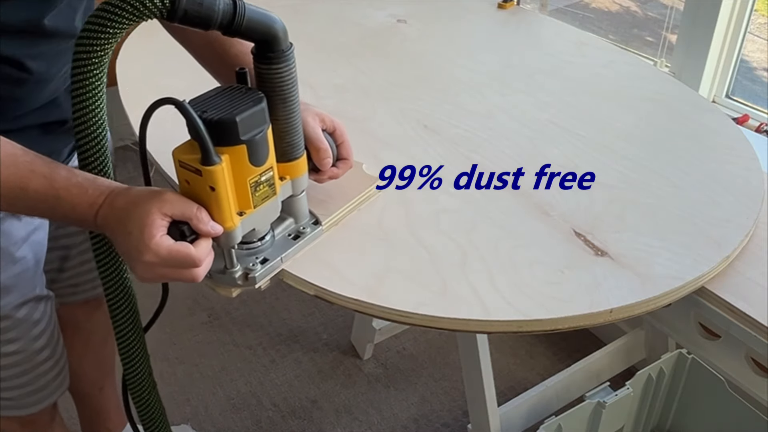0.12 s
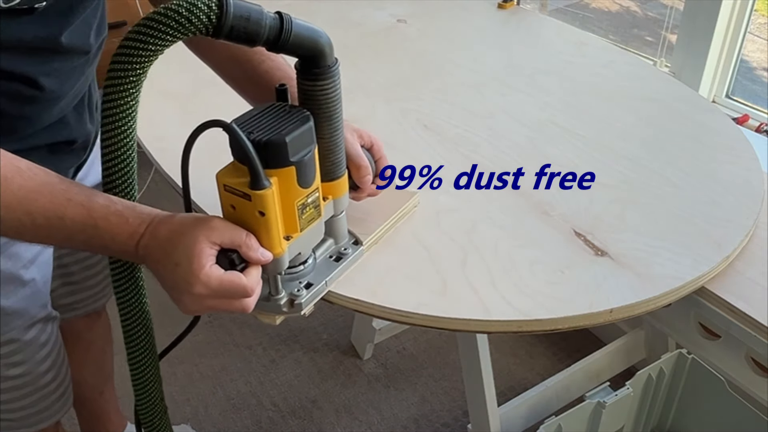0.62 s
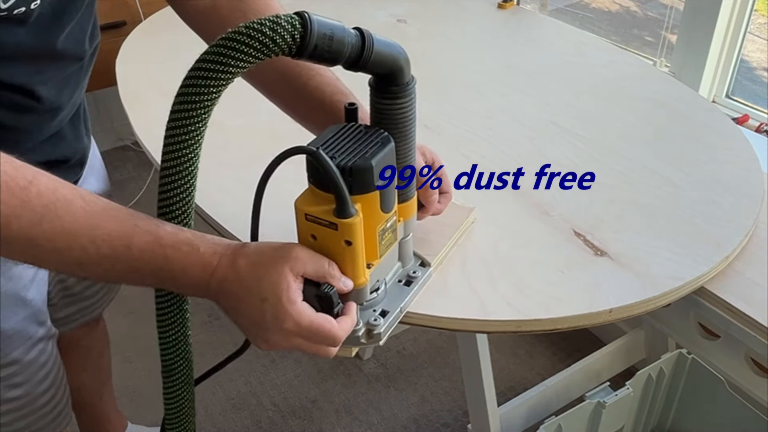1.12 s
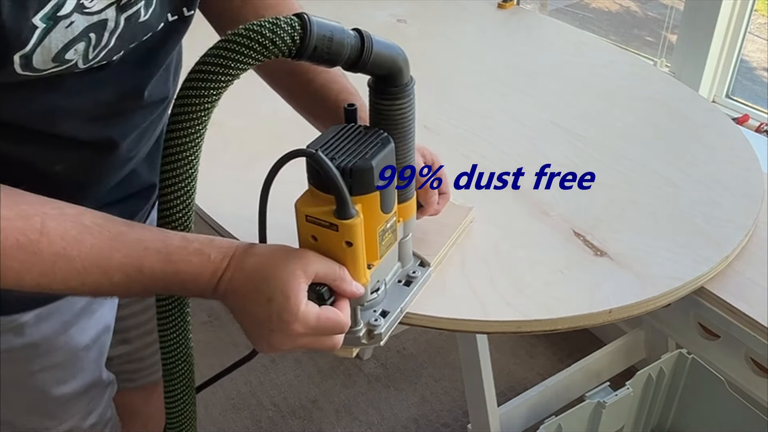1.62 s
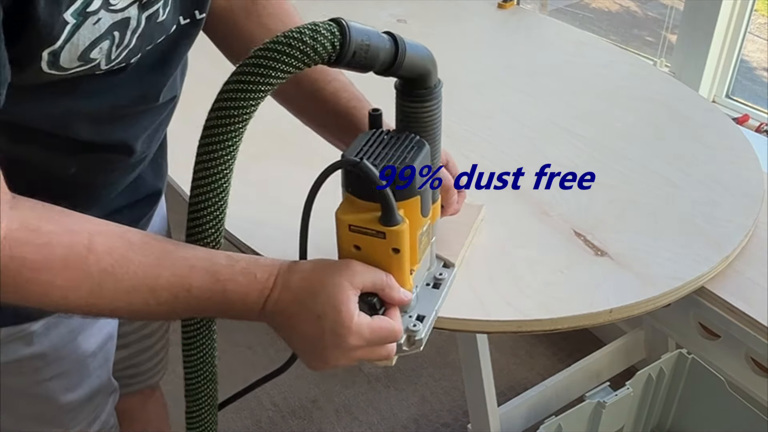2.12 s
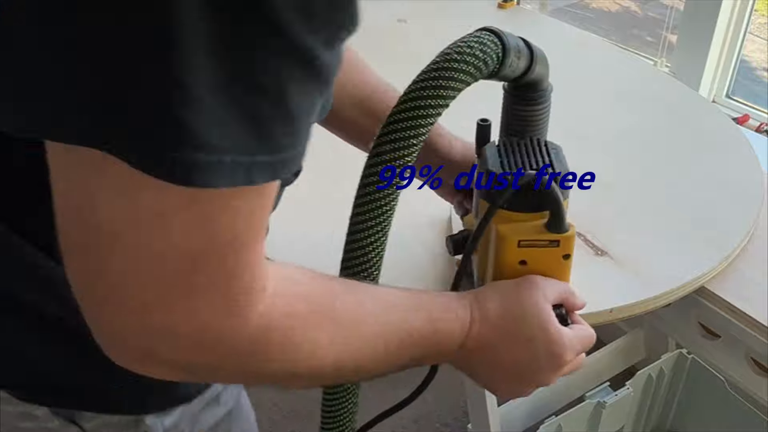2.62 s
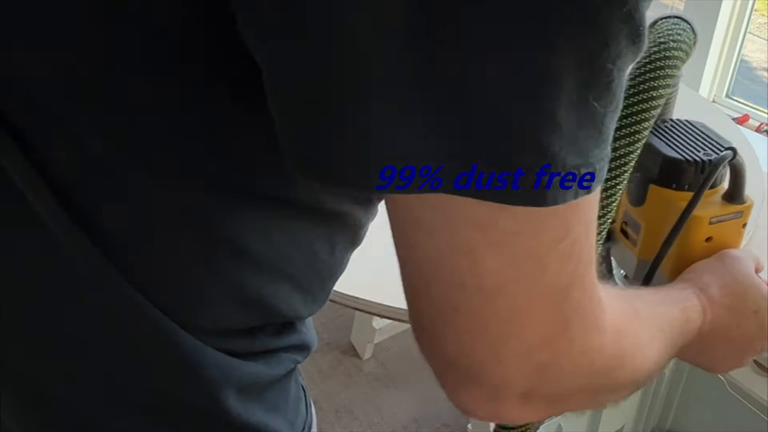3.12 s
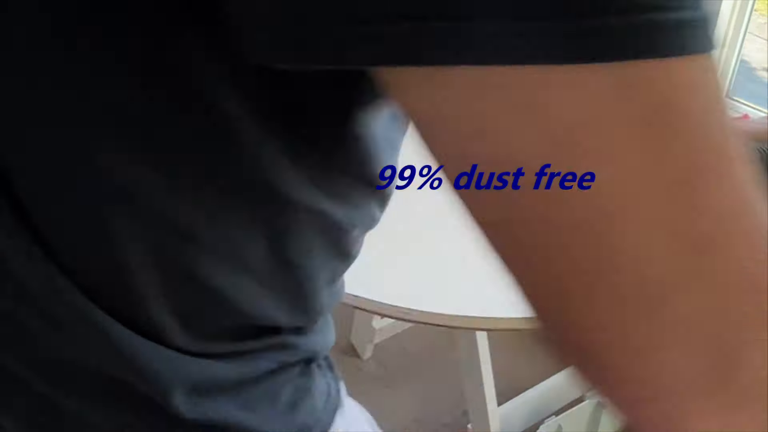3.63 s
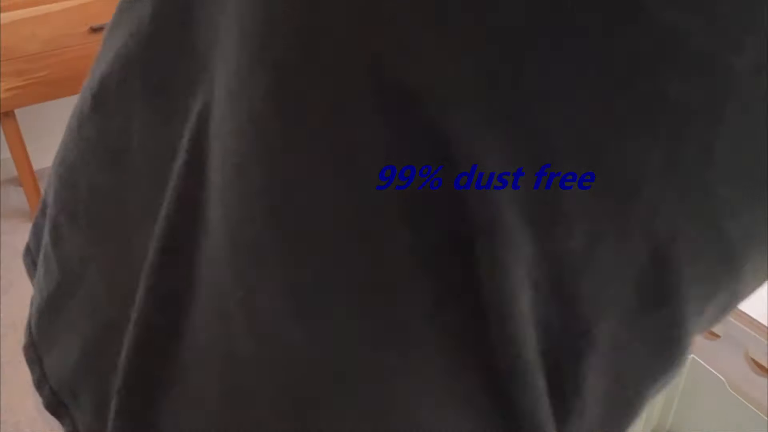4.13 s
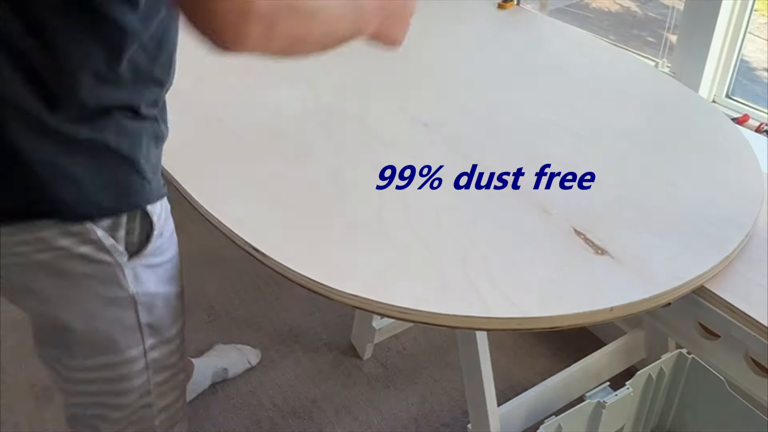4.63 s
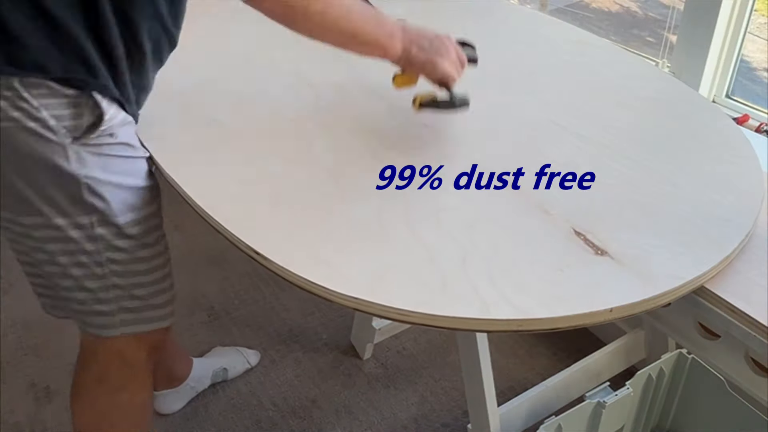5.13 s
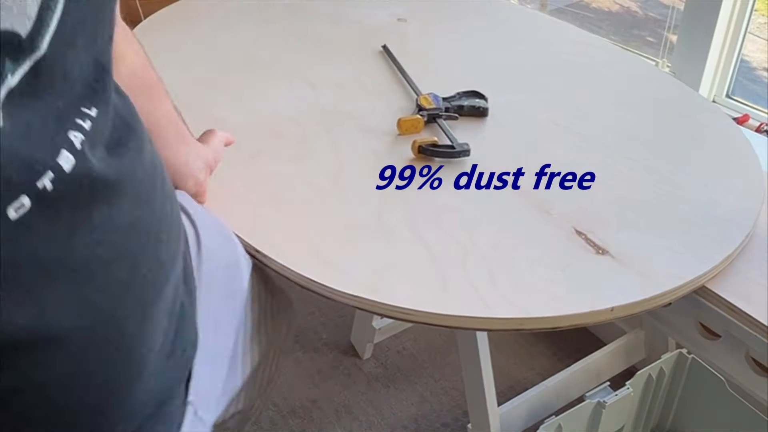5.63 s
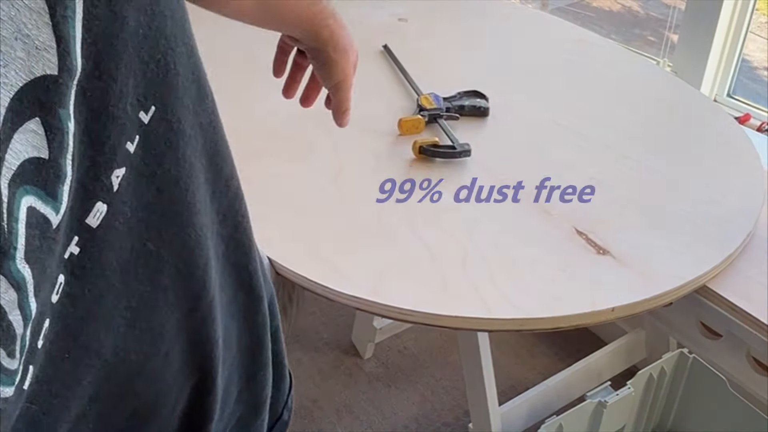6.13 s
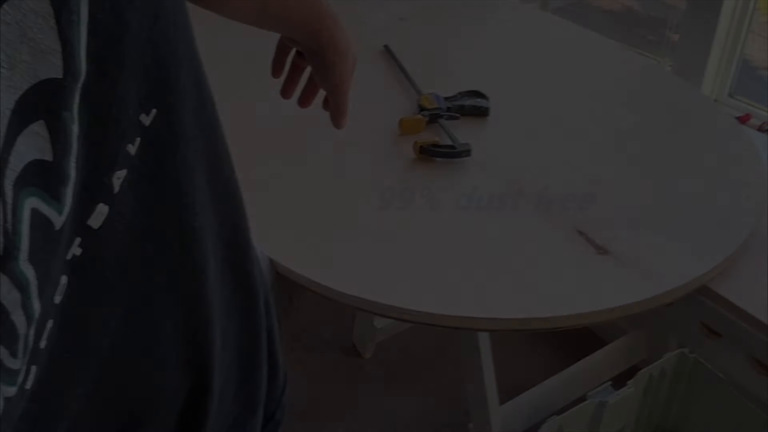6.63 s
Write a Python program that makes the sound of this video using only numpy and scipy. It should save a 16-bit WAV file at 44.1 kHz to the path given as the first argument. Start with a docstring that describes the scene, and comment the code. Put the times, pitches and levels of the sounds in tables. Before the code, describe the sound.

A router whines loudly along plywood over a dust extractor's rush, spins down, restarts, coasts out, then a soft thud and scuff before silence.

```python
"""Small workshop, two close microphone ports: a plunge router whines along a plywood edge over a dust extractor.
Just before 1 s it is switched off and spins down, restarts at 1.7 s, and coasts out for good from 3.3 s.
Its shaft orders, bearing tone with sidebands and fan whistle are gliding sines; its cooling air is shaped noise.
The extractor, noise with hose resonances and a faint hum, is heard low under the router and then rises: a set
level curve stands for the recorder's automatic gain.
A low decaying sine thuds at 4.8 s and a noise scuff follows at 5.1 s; just after 6 s all fades to silence."""
import sys
import numpy as np
from scipy import signal
from scipy.io import wavfile
from scipy.ndimage import uniform_filter1d

SR = 44100
rng = np.random.default_rng(int(sys.argv[2]) if len(sys.argv) > 2 else 0)


def level_to_linear(level):
    """Convert decibel levels to linear amplitude factors, elementwise."""
    exponent = np.asarray(level, float) / 20
    return 10 ** exponent


def file_out(sig):
    """Save sig as 16-bit WAV at sys.argv[1]."""
    # one column per channel
    cols = np.atleast_2d(sig).T
    # limit, then scale
    lim = np.clip(cols, -1, 1)
    pcm = np.round(lim * 32767).astype(np.int16)
    wavfile.write(sys.argv[1], SR, pcm)


N = 297675

# router switch: (off [s], on again [s]); the last pair never comes on
SWITCH = [(.98, 1.69), (3.255, 9)]
# bearing tone against the shaft: (time [s], multiple of shaft speed)
BEARING_RATIO = [(0, 3.615), (.5, 3.6), (.66, 3.62), (.78, 3.645), (1.25, 3.69), (1.7, 3.63), (2, 3.61),
                 (2.25, 3.625), (2.6, 3.645), (2.76, 3.615), (3, 3.628), (3.25, 3.635), (3.4, 3.66)]
# upper shaft harmonics: (multiple of shaft speed)
HIGHER_ORDERS = (3, 5, 6, 7, 8, 9, 10, 11, 13, 14, 15, 17)
# one row per upper harmonic: (level in the group [dB], left over right [dB], left leads [rad])
HIGHER_TONES = [(-9, 17.5, 1.5), (-12.5, -7.5, 1), (-7.5, 5.5, -0.4), (-14, -1.5, 0.5), (-8, 13.5, -2.5),
                (-12.5, -1.5, -1), (-13.5, 2.5, 2), (-14, 12.5, -1), (-9.5, 11.5, 4), (-15, 10.5, 2.3),
                (-19, 7, 4.5), (-12.5, 13.5, 8)]
# bearing sidebands: (distance from the bearing tone [shaft turns])
SIDE_TURNS = (-2, -1, 1, 2, 3, 4, 5)
# one row per sideband: (level in the group [dB], left over right [dB], left leads [rad])
SIDEBAND_TONES = [(-27.5, -2, 1.5), (-17, 1, -1.5), (-11.5, 3.5, -2.16), (-4.5, 5, -1.33), (-23, -4, 3.5),
                  (-15.5, 6, 3.5), (-11.5, 1, 1.72)]
# single tones at the ports: (left over right [dB], left leads [rad], change of lead [rad/s], flicker [dB])
SHAFT_TONE = (16, 2.5, 0.75, 1.8)
BITE_TONE = (-1.3, 1.82, 0.2, 1.6)
FOURTH_TONE = (1.4, -.9, 1.21, 2.3)
BEARING_TONE = (2.5, -.1, .7, 1.5)
OCTAVE_TONE = (2.5, -1.3, .05, 2.5)
WHISTLE_TONE = (-1.5, -1.2, .05, 4.5)
HUM_TONE = (2, 1, 0, 3.5)
# shaft and bearing, powered and coasting alike: (time [s], level [dB])
SHAFT_LEVEL = [(0, -39.5), (.88, -39), (1.05, -49), (1.12, -61), (1.2, -59), (1.4, -53.5), (1.68, -75),
               (1.8, -43), (1.9, -54.5), (2, -44.5), (2.25, -44), (2.48, -38), (3.1, -40), (3.2, -44.5),
               (3.36, -42), (3.43, -74), (3.6, -61), (3.78, -83), (3.97, -54), (4.1, -64), (4.3, -89)]
BEARING_LEVEL = [(0, -39.5), (.44, -43), (.66, -55), (.77, -33.5), (.87, -25.5), (.998, -25.5), (1.01, -50),
                 (1.06, -60), (1.25, -51), (1.36, -48), (1.5, -45), (1.66, -50), (1.72, -57), (1.81, -49.5),
                 (1.84, -29), (2.05, -28), (2.17, -32), (2.28, -40), (2.48, -32.5), (2.6, -48),
                 (2.96, -35.5), (3.3, -43), (3.45, -49), (3.75, -56), (4, -51), (4.3, -72)]
# two-flute bite, fourth order, upper harmonics, sidebands, bearing octave and fan whistle
# while powered: (time [s], level [dB])
BITE_LEVEL = [(0, -40.5), (.22, -33), (.35, -32), (.62, -32), (.76, -29.5), (.88, -41.5), (1, -51),
              (1.76, -28.5), (1.9, -28.5), (2.25, -32), (2.46, -37.5), (2.56, -34.5), (2.72, -38),
              (2.96, -33), (3.2, -35), (3.27, -41)]
FOURTH_LEVEL = [(0, -53.5), (.33, -44.5), (.66, -38.5), (.9, -50), (1.8, -37), (1.9, -51), (2, -42.5),
                (2.24, -48.5), (2.5, -41.5), (2.96, -33), (3.1, -32), (3.27, -54)]
HIGHER_LEVEL = [(0, -31.5), (.66, -32.5), (.88, -44.5), (1, -56), (1.8, -41), (1.9, -33), (2.45, -41.5),
                (2.6, -36.5), (3.1, -38.5), (3.27, -54)]
SIDES_LEVEL = [(0, -29.5), (.11, -32.5), (.77, -32), (1, -44.5), (1.8, -36.5), (1.9, -32), (2.24, -34),
               (2.72, -42), (2.96, -33), (3.25, -39.5)]
OCTAVE_LEVEL = [(0, -50), (.75, -50), (.9, -40.5), (1.8, -44), (2, -52), (2.48, -42.5), (3.3, -54.5)]
WHISTLE_LEVEL = [(0, -41), (.11, -32.5), (.8, -34), (1, -48.5), (1.8, -47), (1.83, -27.5), (1.9, -42),
                 (2.45, -41), (2.6, -51), (2.72, -34.5), (3.08, -44.5), (3.2, -60), (3.27, -39)]
# the same six unpowered, in that order: (level carried back to full speed [dB], fall [dB per octave of speed])
COASTING = [(-58, 13), (-54.5, 5), (-48.5, 15.5), (-48, 11.5), (-56, 5), (-46, 11.5)]
# table and workshop modes that ring as a gliding tone passes: (frequency [Hz], width [Hz], level [dB])
RINGING = [(138, 26, 17), (190, 14, 17), (238, 18, 10), (290, 14, 18), (580, 30, 2), (810, 50, 12),
           (1535, 50, 16)]
# colour of the cooling air at full speed: (frequency [Hz], relative density [dB per Hz])
AIR_COLOUR = [(60, -28), (250, -18), (480, -11), (900, -6.5), (1500, -4), (2200, -4.5), (3500, -8.5),
              (5200, -9), (7000, -11), (11000, -15.5), (14800, -22), (16300, -42.5)]
# the thud: (time [s], level before its soft onset [dB], frequency [Hz], time to fall 60 dB [s])
THUD = (4.8, -21, 215, .06)
# the scuff: (time [s], level [dB])
SCUFF_LEVEL = [(5.108, -55), (5.125, -27), (5.138, -26.5), (5.15, -29), (5.165, -33), (5.19, -60)]
# its colour: (frequency [Hz], relative density [dB per Hz])
SCUFF_COLOUR = [(60, -11.5), (150, -2.5), (800, 1), (2300, -5.5), (5500, -14.5), (10000, -26)]
# colour of the suction: (frequency [Hz], relative density [dB per Hz])
SUCTION_COLOUR = [(18, -45.5), (30, -21), (189, -7), (345, -14), (569, -7.5), (889, -9), (1250, -1.5),
                  (1720, -12.5), (1960, -19.5), (3400, -13.5), (4420, -18), (5170, -18.5), (6050, -24.5),
                  (9970, -23), (16000, -42)]
# hose and canister resonances: (frequency [Hz], width [Hz], lift [dB])
HOSE = [(584, 35, 7), (1268, 36, 5.5), (1722, 89, 7.5), (2220, 140, 6), (2800, 180, 3.5), (3300, 37, 0.5),
        (4755, 110, 6.5), (5225, 130, 6)]
# extractor level as heard: the recorder's automatic gain holds it low under the loud router,
# then lets it rise: (time [s], level [dB])
SUCTION_LEVEL = [(0, -40.5), (.7, -42.5), (1.1, -35.5), (1.5, -39.5), (1.76, -35.5), (2.9, -38), (3.3, -37),
                 (4.1, -36), (5.4, -31.5), (5.85, -29.5), (6.05, -29.5)]
# faint wavering hum in the suction: (time [s], level [dB])
HUM_LEVEL = [(3.5, -70), (3.75, -50), (4.6, -50.5), (5.2, -58), (6.1, -59)]
# noise at the two ports: (frequency [Hz], left-right likeness [0..1])
LIKENESS = [(60, 0.71), (200, 0.73), (400, 0.99), (1400, 0.95), (1900, 0.13), (4300, 0.32), (5000, 0.23),
            (5800, 0.036), (9700, 0.044), (11000, 0.52), (13000, 0.5), (15000, .35)]
# noise at the two ports: (frequency [Hz], left leads [rad])
LEAD = [(0, 0), (250, 0.15), (450, -2), (1500, -1.5), (4200, -3), (6100, -9.5), (8000, -13.5),
        (10000, -16.5), (12500, -17.5), (13400, -17.5), (15500, -20)]
# noise at the two ports: (frequency [Hz], left over right [dB])
TILT = [(60, 1.0), (110, 1.5), (200, 2.5), (380, 3.0), (700, 1.0), (1290, 1.5), (2380, 2.0), (4400, 6.0),
        (8120, 0.5), (15000, -1.5)]
# closing fade: (start [s], end [s])
FADE = (6.068, 6.128)

FULL_HZ, COAST_S = 362.4, 0.8  # governed shaft speed; unpowered it loses 63% in COAST_S
SPIN_UP_S, ROUNDING = 0.105, 1.4  # length and curvature of the climb
OVERSHOOT, SETTLE_S = 0.025, 0.05  # share of full speed, and its decay time
LET_GO = 0.0733  # share of speed lost before the tones reach their coasting level
TAKE_HOLD = 0.68  # share of speed still missing when the tones start to swell on restart
SPIN_UP_DB = -2  # change of the coasting levels while the shaft climbs
SILENT_S, LAST_FADE_S = 4.35, 0.23  # end of the motor tones, and the last dip before it
FAN_BLADES = 31
SIDES_TILT_DB = 0.53  # per shaft turn and second, about the second upper sideband
AIR_DB, AIR_DB_PER_OCTAVE = -32, 9.5  # air without chips at full speed, its fall with speed
CHIPS_DB = 2  # extra air noise while powered
HUM_HZ = 556


def motor():
    """Shaft orders, the bearing family between them and the fan whistle all ride on one hunting speed."""
    t = np.arange(0, SILENT_S, 1 / SR)
    share = speed(t)
    power = powered(share)
    climbing = uniform_filter1d(1.0 * (np.gradient(share) > 0), size=400)
    last_dip = np.clip(1 - (SILENT_S - t) / LAST_FADE_S, 0, 1)
    coast_db = SPIN_UP_DB * climbing - 20 * last_dip

    levels = []
    curves = (BITE_LEVEL, FOURTH_LEVEL, HIGHER_LEVEL, SIDES_LEVEL, OCTAVE_LEVEL, WHISTLE_LEVEL)
    for curve, (db, fall_db) in zip(curves, COASTING):
        unpowered_db = db + fall_db * np.log2(share) + coast_db
        levels.append(power * follow(curve, t) + (1 - power) * unpowered_db)
    bite, fourth, higher, sides, octave, whistle = levels

    hz = FULL_HZ * share * (1 + 0.001 * wander(t, top_hz=30))
    turns = np.cumsum(hz) / SR
    ratio = follow(BEARING_RATIO, t) + 0.0058 * wander(t, top_hz=18)
    rolls = np.cumsum(hz * ratio) / SR
    blades = FAN_BLADES * turns + 0.05 * wander(t, top_hz=120)  # turbulent air blurs the whistle

    out = tone(turns, follow(SHAFT_LEVEL, t), *SHAFT_TONE)
    out += tone(2 * turns, bite, *BITE_TONE)
    out += tone(4 * turns, fourth, *FOURTH_TONE)
    out += tone(rolls, follow(BEARING_LEVEL, t), *BEARING_TONE)
    out += tone(2 * rolls, octave, *OCTAVE_TONE)
    out += tone(blades, whistle, *WHISTLE_TONE)
    out += tone(blades + turns, whistle - 22, *WHISTLE_TONE)  # weak partial one shaft order up
    for k, (db, pan_db, lead) in zip(HIGHER_ORDERS, HIGHER_TONES):
        out += tone(k * turns + rng.random(), higher + db, pan_db, lead, travel=0, flicker_db=1.8)
    for k, (db, pan_db, lead) in zip(SIDE_TURNS, SIDEBAND_TONES):
        level_db = sides + db + SIDES_TILT_DB * (k - 2) * t  # the upper ones gain as the tool travels
        out += tone(rolls + k * turns + rng.random(), level_db, pan_db, lead, travel=0, flicker_db=2.5)
    rest = N - len(t)
    return np.pad(out, ((0, 0), (0, rest))), np.pad(turns, (0, rest), "edge")


def speed(t):
    """Shaft speed as a share of full: it coasts down, climbs fast on restart and overshoots a little."""
    share = np.ones(len(t))
    for off, on in SWITCH:
        coast = np.exp(-np.clip(t - off, 0, on - off) / COAST_S)
        climb = 1 - np.clip(1 - (t - on) / SPIN_UP_S, 0, 1) ** ROUNDING
        settling = np.exp(-np.maximum(t - on - SPIN_UP_S, 0) / SETTLE_S)
        share = share * (coast + (1 - coast) * climb + OVERSHOOT * climb ** 8 * settling)
    return share


def powered(share):
    """1 at full speed, 0 once the shaft has let go; on the climb it comes in earlier."""
    span = np.where(np.gradient(share) > 0, TAKE_HOLD, LET_GO)
    return np.clip(1 - (1 - share) / span, 0, 1)


def tone(turns, level_db, pan_db, lead, travel, flicker_db):
    """One partial at both ports; reflections make its level and port phase drift as the tool moves."""
    t = np.arange(len(turns)) / SR
    hz = np.gradient(turns) * SR
    speed_lost = 1 - uniform_filter1d(hz, size=2000) / hz[:4000].mean()
    glide = np.clip(speed_lost, 0, 0.5)
    # a gliding tone runs through the room's peaks and dips and breaks up
    common_db = level_db + (flicker_db + 12 * glide) * np.minimum(wander(t, top_hz=60), 0.9)
    # the mean power of the two ports stays the same whatever the pan
    left_db, right_db = pan_db * np.array([0.5, -0.5]) - 10 * np.log10(np.cosh(pan_db * np.log(10) / 20))
    drift = lead + travel * t + 0.2 * wander(t, top_hz=3)
    turns = turns + 0.45 * glide * wander(t, top_hz=40)  # the glide wavers too
    left = level_to_linear(common_db + left_db) * np.cos(2 * np.pi * turns + drift / 2)
    right = level_to_linear(common_db + right_db) * np.cos(2 * np.pi * turns - drift / 2)
    return np.sqrt(2) * np.array([left, right])


def ring(x):
    """Adds narrow table and workshop modes, which turn a smooth glide into steps."""
    out = x
    for hz, width, db in RINGING:
        out = out + level_to_linear(db) * signal.lfilter(*signal.iirpeak(hz, hz / width, SR), x)
    return out


def cooling_air(turns):
    """Fan and chip noise that dulls as the shaft slows and throbs once a turn."""
    def colour(hz, t):
        share = speed(t)
        octaves = np.log2(share)
        shape_db = read(AIR_COLOUR, hz) + 3.6 * octaves * np.log2(1 + hz / 3000)
        level_db = AIR_DB + AIR_DB_PER_OCTAVE * octaves + CHIPS_DB * powered(share)
        return unit_db(shape_db) + level_db

    throb = 1 + 0.1 * np.cos(2 * np.pi * turns)
    return rush(colour, patchy_db=1.5, swell_db=0.8) * throb


def thud():
    """A soft low knock: one decaying sine, alike at both ports."""
    start, db, hz, t60 = THUD
    age = np.maximum(np.arange(N) / SR - start, 0)
    onset = 1 - np.exp(-age / 0.004)
    return level_to_linear(db - 60 * age / t60) * onset * np.sin(2 * np.pi * hz * age)


def scuff():
    """A short wide scuff on the table: coloured noise under a brief envelope."""
    t = np.arange(N) / SR
    noise = evened(rush(lambda hz, frames: read(SCUFF_COLOUR, hz) + 0 * frames, patchy_db=2, swell_db=0))
    return noise * level_to_linear(np.interp(t, *np.transpose(SCUFF_LEVEL), left=-200, right=-200))


def extractor():
    """Suction noise lifted at the resonances of hose and canister, with a faint wavering hum."""
    def colour(hz, t):
        lift_db = sum(db / (1 + (2 * (hz - f) / width) ** 2) for f, width, db in HOSE)
        return unit_db(read(SUCTION_COLOUR, hz) + lift_db) + follow(SUCTION_LEVEL, t)

    t = np.arange(N) / SR
    turns = np.cumsum(HUM_HZ * (1 + 0.015 * wander(t, top_hz=15))) / SR
    hum = tone(turns, follow(HUM_LEVEL, t), *HUM_TONE)
    return rush(colour, patchy_db=0.9, swell_db=0.55) + hum


def rush(colour_db, patchy_db, swell_db):
    """Noise at both ports from random short-time spectra; colour_db(Hz, s) gives the field of levels."""
    frames, hz = N // 256 + 5, np.fft.rfftfreq(1024, 1 / SR)
    t = np.arange(frames) * 256 / SR
    a, b, c, d, patches = rng.standard_normal((frames, 513, 5)).T
    patches = uniform_filter1d(patches, size=10, axis=0)
    patches = evened(uniform_filter1d(patches, size=6, axis=1))
    same = np.clip(read(LIKENESS, hz), 0, 1)[:, None]
    left = a + 1j * b
    lag = np.exp(-1j * follow(LEAD, hz))[:, None]
    right = lag * (same * left + np.sqrt(1 - same ** 2) * (c + 1j * d))
    z = np.array([left, right])
    z *= level_to_linear(np.multiply.outer([0.5, -0.5], read(TILT, hz)))[..., None]
    z *= level_to_linear(colour_db(hz[:, None], t) + patchy_db * patches + swell_db * wander(t, top_hz=40))
    return signal.istft(z, nperseg=1024, noverlap=768)[1][:, :N]


def unit_db(field_db):
    """Sets every frame of a level field to the same power."""
    return field_db - 10 * np.log10(np.sum(level_to_linear(2 * field_db), 0) / 2)


def wander(t, top_hz):
    """Slow chance: sines of random phase up to top_hz, evened to an rms of 1."""
    coarse = np.arange(0, t[-1] + 0.01, 0.002)
    slow = 0
    for f in np.geomspace(top_hz / 15, top_hz, num=16):
        slow = slow + np.sin(2 * np.pi * (f * coarse + rng.random())) / np.sqrt(f)
    return np.interp(t, coarse, evened(slow))


def evened(x):
    """Scales to an rms of 1."""
    return x / np.sqrt(np.mean(x ** 2) + 1e-20)


def read(points, hz):
    """Reads a spectrum on a log-frequency axis."""
    f, value = np.transpose(points)
    return np.interp(np.log(hz + 1), np.log(f + 1), value)


def follow(points, x):
    """Reads a curve along straight lines between its points."""
    return np.interp(x, *np.transpose(points))


def scene():
    """The workshop at the two ports: router first, then the handling, and the extractor behind."""
    whine, turns = motor()
    return ring(whine) + cooling_air(turns) + thud() + scuff() + extractor()


def top_cut(x):
    """Nothing passes above the cut-off."""
    return signal.sosfilt(signal.butter(12, 16420, fs=SR, output="sos"), x)


def record(dry):
    """A smooth fade to silence, then the upper band limit."""
    start, end = FADE
    left_to_go = np.clip((end - np.arange(N) / SR) / (end - start), 0, 1)
    faded = dry * np.sin(np.pi / 2 * left_to_go) ** 2
    low_pass = signal.firwin(511, 15850, window=("kaiser", 9), fs=SR)[None]  # edge in Hz
    mix = signal.oaconvolve(faded, low_pass, "same", axes=1)
    return top_cut(mix)


dry = scene()
out = record(dry)
file_out(out)
```